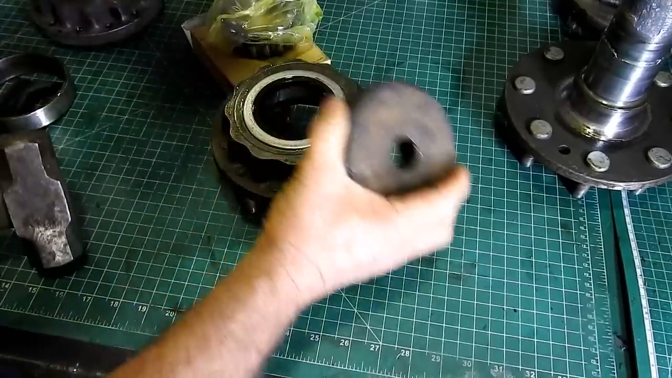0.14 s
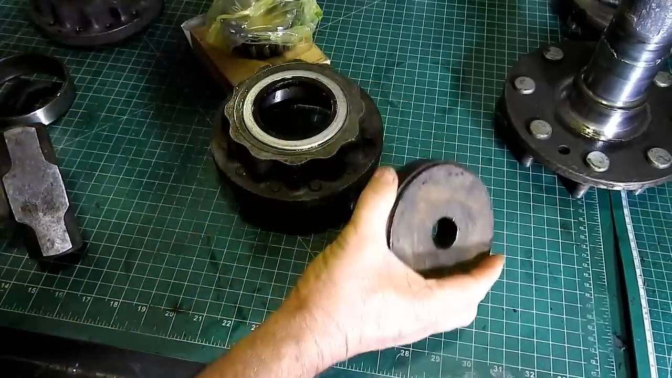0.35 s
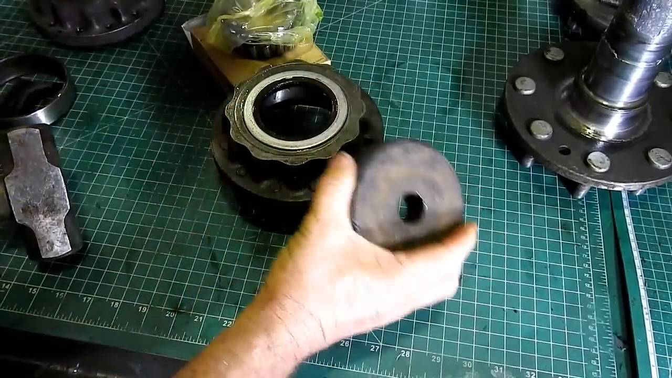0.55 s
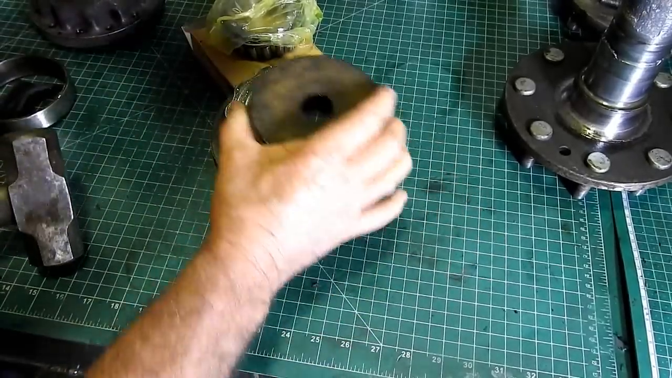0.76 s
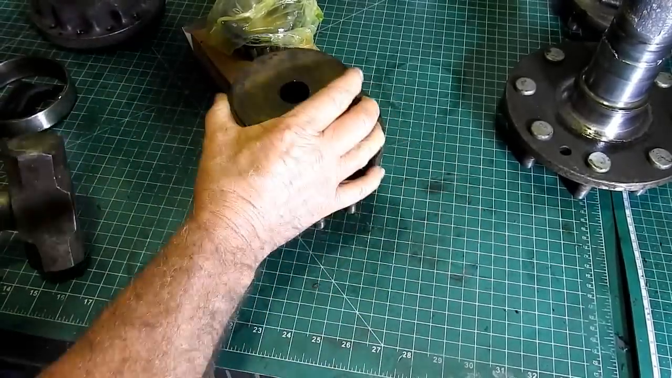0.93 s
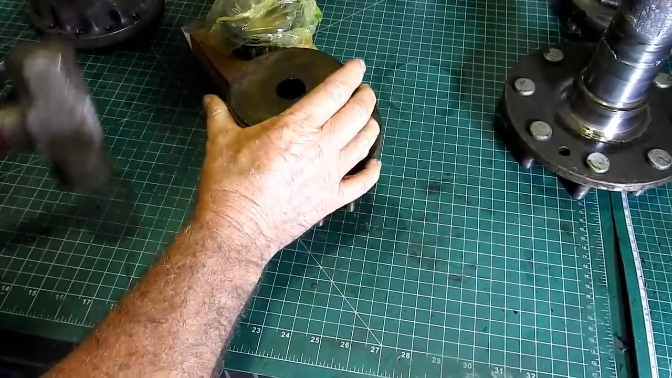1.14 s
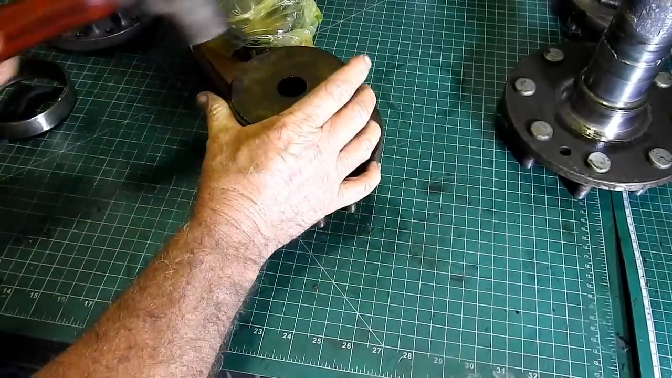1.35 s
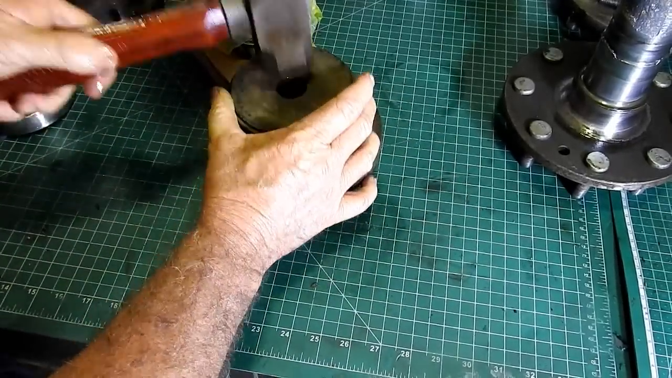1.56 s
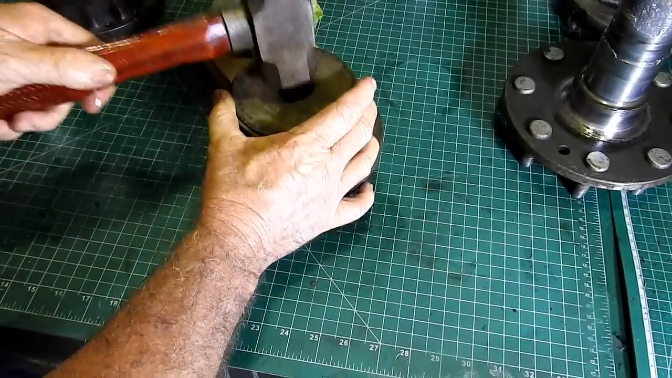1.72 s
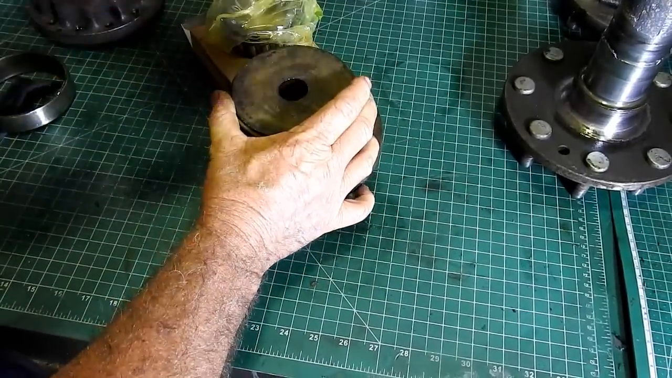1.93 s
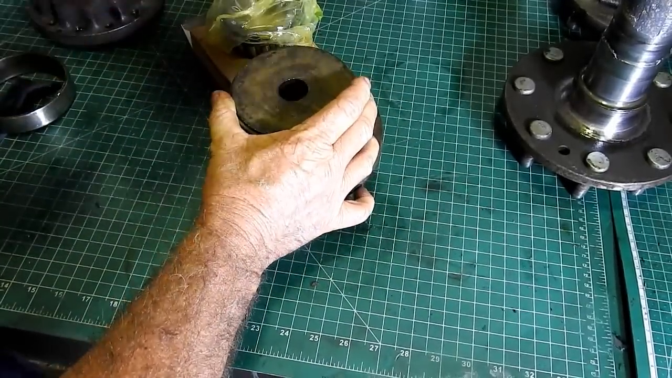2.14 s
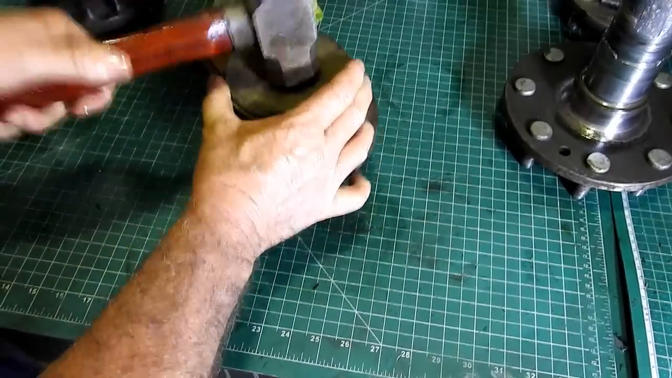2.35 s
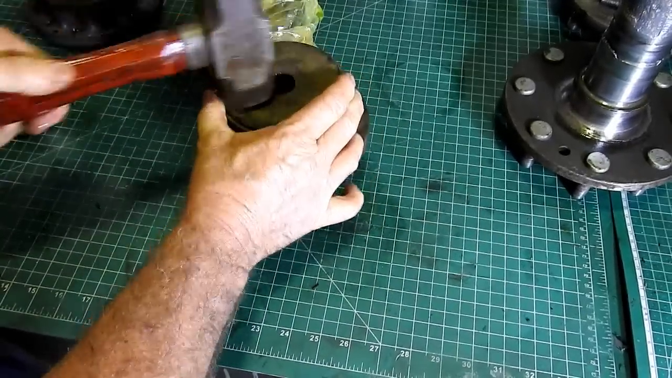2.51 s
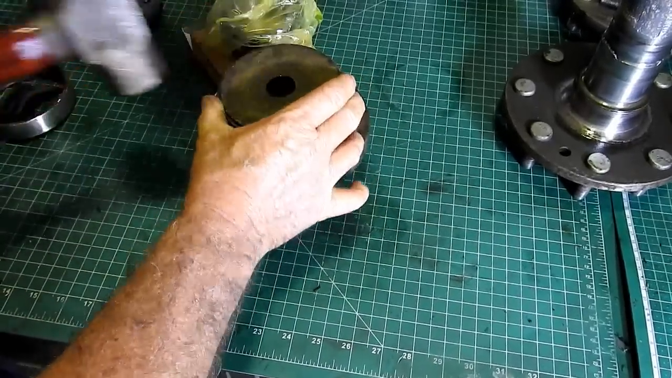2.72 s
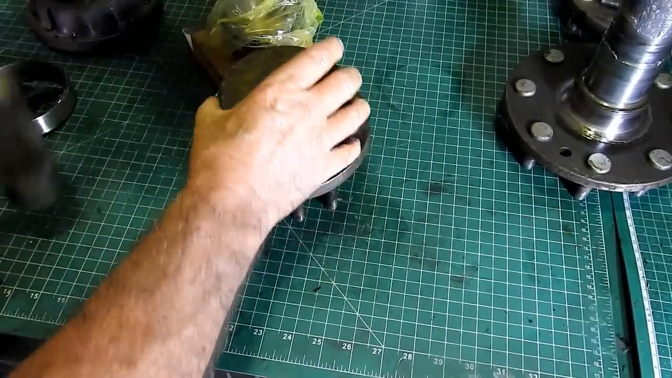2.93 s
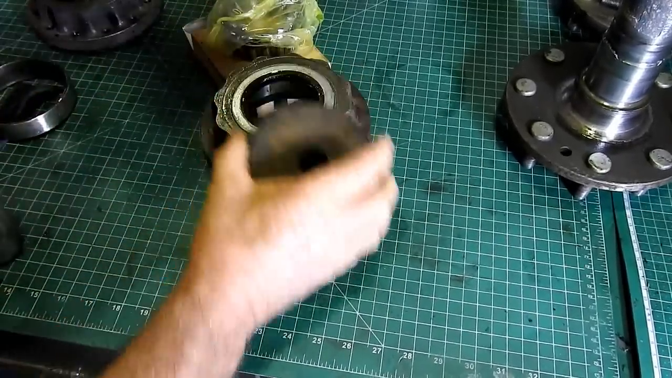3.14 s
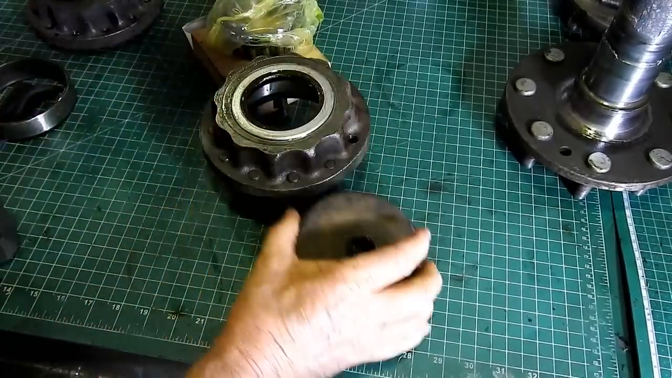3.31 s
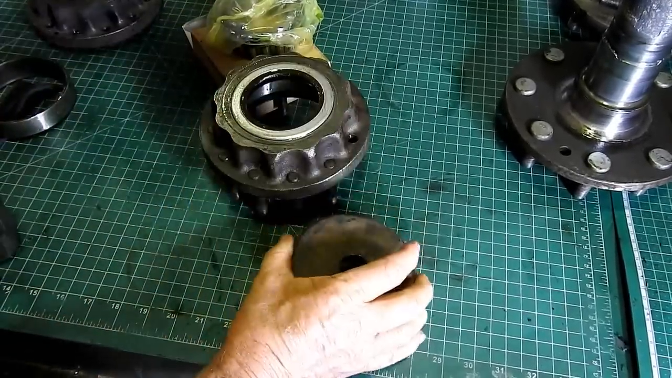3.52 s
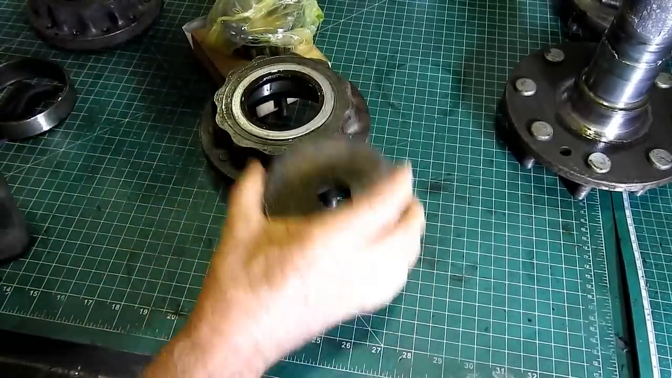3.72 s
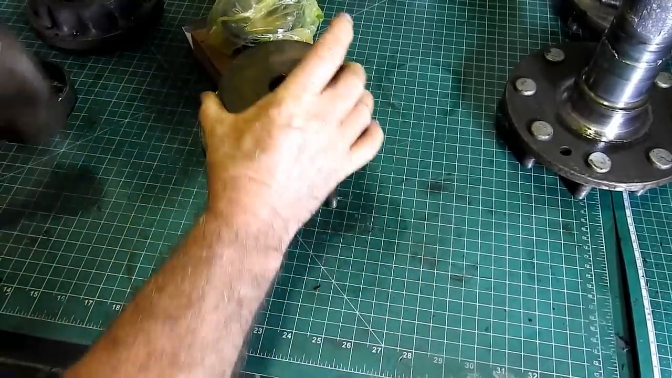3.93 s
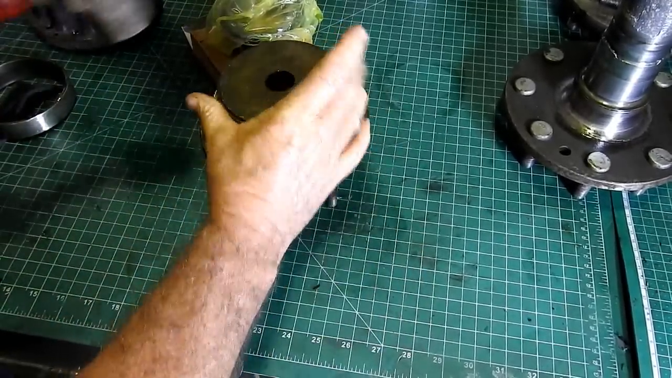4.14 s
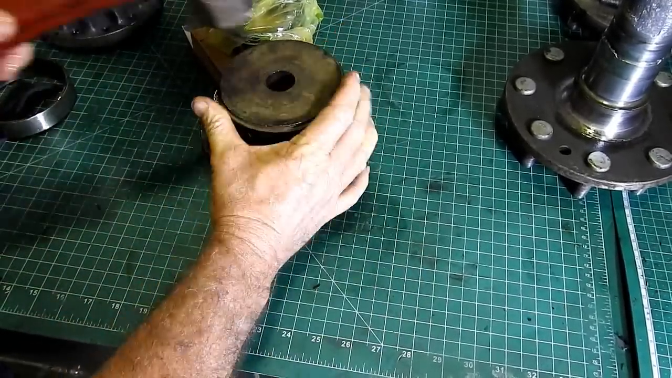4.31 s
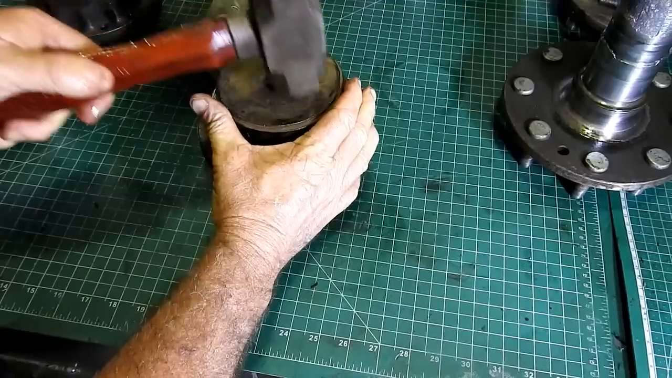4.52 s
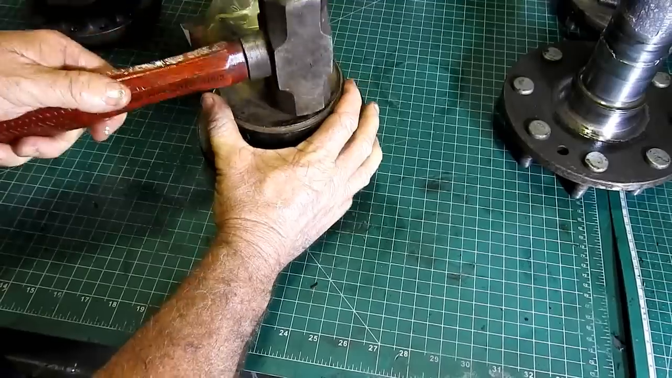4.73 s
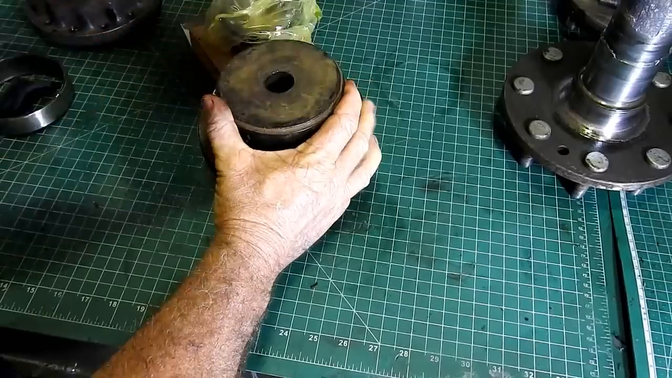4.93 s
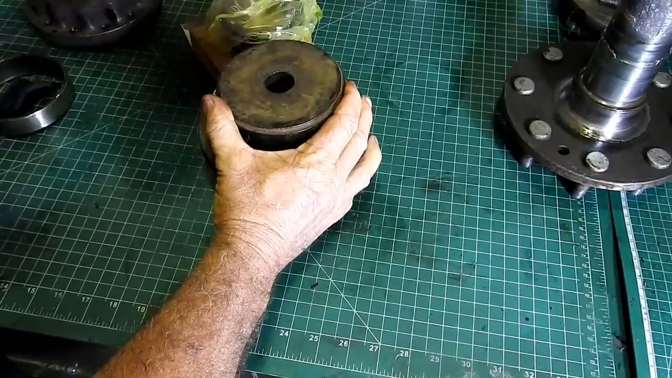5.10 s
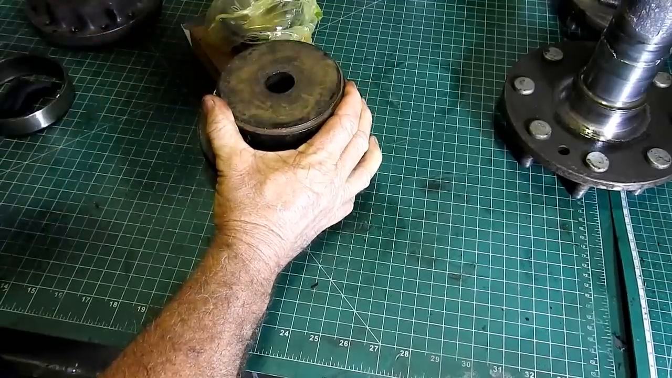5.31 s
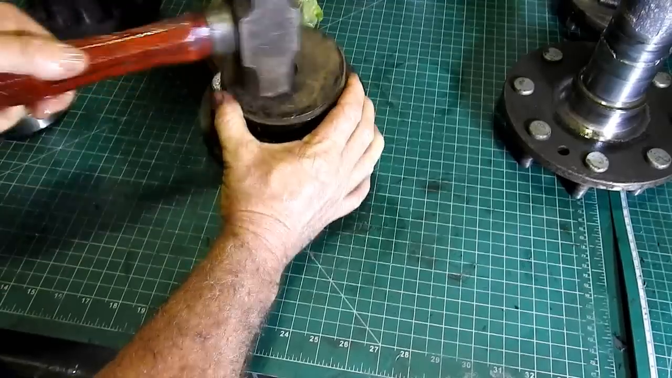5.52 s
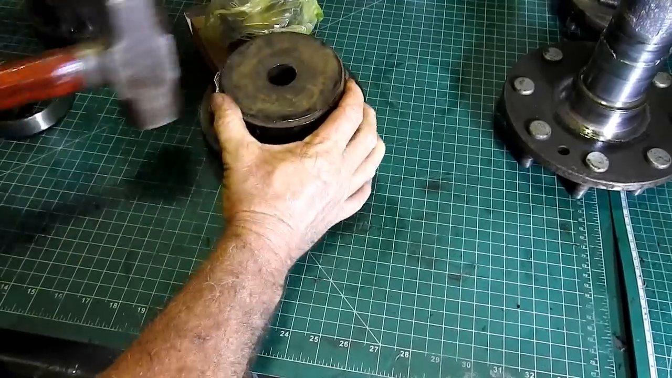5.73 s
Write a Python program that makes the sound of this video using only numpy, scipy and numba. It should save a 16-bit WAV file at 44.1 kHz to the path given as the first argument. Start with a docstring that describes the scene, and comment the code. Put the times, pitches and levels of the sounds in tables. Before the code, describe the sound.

Close up at a workbench in an echoing workshop, a steel disc knocks and scrapes off a wheel hub, then settles with small ticks. A hammer taps it, then strikes very hard. The disc is knocked and dragged off again, clinks back into place, and receives another tap and a harder, overloaded blow, with one last knock in the dying echo.

```python
"""First come a knock and a scrape of steel over a faint room hiss: a disc is dragged off a wheel hub on a bench.
Set on the hub's seal, it is hammered in two pairs, each a tap and then a hard blow; between the pairs the disc
is dragged off and set back. Each contact is a clack of filtered noise, with decaying sine waves for the ringing
steel and the thudding bench. The workshop echoes, and a limiter holds the echo of the hard blows level until
it has died down."""
import sys
import numpy as np
from scipy import signal
from scipy.fft import rfft, irfft, next_fast_len
from scipy.io import wavfile
from numba import njit

SR = 44100
rng = np.random.default_rng(int(sys.argv[2]) if len(sys.argv) > 2 else 0)


def master(y):
    """Save y as 16-bit WAV."""
    cut = np.clip(np.atleast_2d(y).T, -1, 1)
    pcm = np.round(cut * 32767)  # scale
    wavfile.write(sys.argv[1], SR, pcm.astype(np.int16))


N = 258426
T = np.arange(N) / SR  # time in s


def undb(db):
    """Turn decibels into gain."""
    return 10 ** (np.asarray(db) / 20)


def along(points, hz):
    """Read a value off a (frequency, value) table, sliding evenly in octaves between its points."""
    f, value = np.transpose(points)
    return np.interp(np.log(hz), np.log(f), value)


def fade(t, t60):
    """Die away exponentially, 60 dB down after t60 seconds."""
    return np.exp(-np.log(1000) * t / np.maximum(t60, 1e-3))


def colour(x, points, tilt=0):
    """Filter a sound to a spectrum, tilted in dB per octave, without smearing it ahead of its start."""
    count = x.shape[-1]
    size = next_fast_len(count // 2 + 2048) * 2
    hz = np.maximum(np.arange(size // 2 + 1) * SR / size, 1)
    db = along(points, hz) + tilt * np.log2(np.clip(hz, 150, 7000) / 1000)
    # folding the cepstrum forwards in time makes the filter minimum-phase
    cepstrum = irfft(np.log(undb(db)))
    cepstrum[1:size // 2] *= 2
    cepstrum[size // 2 + 1:] = 0
    response = np.exp(rfft(cepstrum))
    return irfft(rfft(x, size) * response)[..., :count]


def burst(x, db):
    """Scale a short sound to the energy of 10 ms at this level."""
    energy = np.mean(np.sum(x ** 2, axis=-1))
    return x * undb(db) * np.sqrt(SR / 100 / energy)


def add(track, s, x):
    """Mix a sound into the stereo track at time s."""
    start = max(int(s * SR), 0)
    track[:, start:start + x.shape[-1]] += x[..., :N - start]


# how far apart left and right sound: (f/Hz, side minus mid level/dB)
STEREO_WIDTH = [(60, -32), (125, -31), (250, -21.5), (500, -18), (1000, -13.5), (2000, -9.5), (4000, -9),
                (8000, -1)]


def stereo_noise(count):
    """White noise at two close microphones: alike in the bass, apart in the treble."""
    mid, side = rfft(rng.standard_normal((2, count)))
    hz = np.maximum(np.arange(len(mid)) * SR / count, 1)
    width = undb(along(STEREO_WIDTH, hz))
    left_right = np.array([mid + width * side, mid - width * side])
    return irfft(left_right / np.sqrt(1 + width ** 2), count)


def steady(points):
    """Endless stereo noise of rms 1, shaped to a spectrum."""
    x = colour(stereo_noise(N), points)
    return x / np.std(x)


def ring(modes, db, length=1, tilt=0, scatter=0):
    """A struck body sounds its own tones, each dying away; tilt favours high ones, scatter detunes at random."""
    t = T[:SR // 2]
    detune = 1 + scatter * rng.standard_normal(len(modes))
    total = 0
    for k, (hz, level, t60) in enumerate(modes):
        gain = (-1) ** k * undb(level + tilt * np.log2(hz))  # every other tone is flipped
        total = total + gain * fade(t, t60 * length) * np.sin(2 * np.pi * hz * detune[k] * t)
    return burst(total, db)


def contact(t60, chatter_db):
    """Force of a steel contact: one spike, then a brief chatter of the loose parts all around."""
    t = T[:SR // 4]
    force = burst(stereo_noise(len(t)) * fade(t, t60), chatter_db)
    force[:, 0] += np.sqrt(SR / 100)  # a spike of 0 dB on the scale of burst()
    return force


# spectra of the room noise, the bench rumble and the hiss: (f/Hz, relative level/dB)
ROOM_NOISE = [(15, -61), (25, -35), (59, 0.5), (116, -2), (156, -31), (205, 2.5), (254, -26.5), (299, 0.5),
              (413, -21), (788, -17.5), (902, -18.5), (1280, -17.5), (3660, -25.5), (6450, -16.5),
              (15700, -51)]
BENCH_RUMBLE = [(35, -35), (70, 8.5), (100, 6.5), (170, -6), (300, -8), (600, -23.5), (2000, -30.5),
                (6000, -49)]
HISS_SPECTRUM = [(500, -9), (2000, -17), (3500, -15.5), (6300, -6), (7300, -6.5), (9000, -25), (15000, -41)]
# the hand moving over the bench: (start t/s, end t/s, level/dB)
HAND_MOVES = [(0.29, 1.142, -44), (3.394, 4.223, -43), (4.628, 5.01, -33.5)]
# soft flares of hiss: t/s
HISS_FLARES = [0.483, 0.787, 1.033, 1.585, 2.252]
ROOM_NOISE_DB, RESTING_RUMBLE_DB, FLARE_DB = -48, -67, -41
HAND_FADE_S = .12


def background(flare_t60=0.66, flare_rise_s=0.0044):
    """Steady room noise, the bench rumbling under a moving hand, and a hiss that flares softly now and then."""
    flares = 0
    for s in HISS_FLARES:
        rise = np.clip((T - s) / flare_rise_s, 0, 1)
        flares = flares + undb(FLARE_DB) * rise * fade(np.abs(T - s), flare_t60)
    rumble = undb(RESTING_RUMBLE_DB)
    for start, end, db in HAND_MOVES:
        rumble = rumble + undb(db) * np.clip(np.minimum(T - start, end - T) / HAND_FADE_S, 0, 1)
    air = undb(ROOM_NOISE_DB) * steady(ROOM_NOISE)
    return air + rumble * steady(BENCH_RUMBLE) + flares * steady(HISS_SPECTRUM)


# one brief low hum: (start t/s, end t/s, f/Hz, level/dB)
LOW_HUM = (.74, .95, 305, -47)


def hum():
    """A faint low sine tone that swells and goes."""
    start, end, hz, db = LOW_HUM
    swell = np.sin(np.pi * np.clip((T - start) / (end - start), 0, 1))
    return undb(db) * swell * np.sin(2 * np.pi * hz * T)


# how long the workshop echoes: (f/Hz, 60 dB decay t/s)
ECHO_DECAY = [(80, 2.2), (250, 0.83), (700, 1), (2000, 1.1), (5700, 0.83), (8100, 0.61), (11000, 0.1)]
# how loud the workshop echoes: (f/Hz, level/dB)
ECHO_LEVEL = [(80, -14), (250, -11), (700, -8), (2000, -10.5), (6000, -9), (8500, -6), (10000, 1),
              (14000, -3)]


def workshop(x, first_wall_s=0.015, early_db=-8):
    """Nearby clutter answers faintly at once; then walls return a dense tail that loses its top treble first."""
    t = T[:int(1.5 * SR)]
    noise = rfft(stereo_noise(len(t)))
    hz = np.maximum(np.arange(noise.shape[1]) * SR / len(t), 1)
    centres = np.geomspace(50, 16000, 18)  # Hz
    tail = 0
    # each row of the identity matrix picks one band, overlapping its neighbours
    for centre, pick in zip(centres, np.eye(len(centres))):
        band = irfft(noise * np.interp(np.log(hz), np.log(centres), pick), len(t))
        shape = fade(t, along(ECHO_DECAY, centre)) * np.where(t < first_wall_s, undb(early_db), 1)
        tail = tail + band * shape * undb(along(ECHO_LEVEL, centre)) / np.sqrt(np.sum(shape ** 2))
    return signal.fftconvolve(x[None], tail, axes=1)[:, :N]


# tones of the workbench: (f/Hz, relative level/dB, 60 dB decay t/s)
BENCH_TONES = [(75.2, -6, 0.27), (104.1, 0.5, 0.21), (165.6, -0.5, 0.23), (206.4, -1, 0.25),
               (258, 0.5, 0.13), (301.4, 0.5, 0.16), (352.4, -7.5, 0.17), (408.5, -7, 0.16)]


def touch(db, spectrum, tilt, t60, thud_db):
    """One contact on the disc: a chattering clack, and the bench thudding under it."""
    clack = burst(colour(contact(t60, chatter_db=12.5), spectrum, tilt), db)
    thud = ring(BENCH_TONES, thud_db, scatter=0.046)
    return thud + np.pad(clack, ((0, 0), (0, len(thud) - clack.shape[1])))


# spectra of a light tick and of a clack on the disc: (f/Hz, relative level/dB)
TICK_SPECTRUM = [(150, -13), (700, -8), (2100, -12.5), (3700, -15.5), (6600, -1), (8500, -16), (11000, -30),
                 (15000, -37)]
DISC_SPECTRUM = [(35, -17.5), (100, -7.5), (200, -1.5), (400, -8.5), (700, -12), (1200, -14.5), (2100, -15),
                 (3700, -25.5), (6600, -17), (8200, -32), (10000, -45), (16000, -87)]
# light ticks of steel just touching: (t/s, level/dB)
STEEL_TICKS = [(.993, -36.5), (1.1183, -30.5), (1.305, -35), (2.395, -34.5), (5.5192, -40)]
TICK_T60_S, TICK_THUD_DB = 0.029, -17  # chatter decay; thud relative to the tick
# soft bumps of the hand shifting its grip: (t/s, level/dB)
HAND_BUMPS = [(4.282, -40.5), (4.545, -45), (4.64, -38.5)]
BUMP_T60_S, BUMP_TILT, BUMP_THUD_DB = 0.049, -5.5, -1  # rub decay; dB per octave; thud relative to the bump


def fingering():
    """While the disc is lined up, steel ticks brightly on steel and the hand bumps softly."""
    out = np.zeros((2, N))
    for s, db in STEEL_TICKS:
        add(out, s, touch(db, TICK_SPECTRUM, 0, TICK_T60_S, db + TICK_THUD_DB))
    for s, db in HAND_BUMPS:
        add(out, s, touch(db, DISC_SPECTRUM, BUMP_TILT, BUMP_T60_S, db + BUMP_THUD_DB))
    return out


# tones of the steel ring of the bearing (its race): (f/Hz, relative level/dB, 60 dB decay t/s)
RACE_TONES = [(1446, -1, 0.019), (2025, 3.5, 0.016), (2740, -2, 0.0098), (4074, -3.5, 0.039),
              (4210, -20, .06), (6100, 2, 0.013)]
# the disc's edge clinking on the race: (t/s, level/dB)
EDGE_CLINKS = [(.138, -28), (4.1424, -21.5)]


def clinks():
    """Set down on its edge, the disc rings the bearing race."""
    out = np.zeros((2, N))
    for s, db in EDGE_CLINKS:
        add(out, s, ring(RACE_TONES, db))
    return out


KNOCK_T60_S = 0.038  # chatter decay of drags and knocks
# tones of the wheel hub: (f/Hz, relative level/dB, 60 dB decay t/s)
HUB_TONES = [(564, 13.5, 0.037), (799.6, 8, 0.11), (1046, 1, 0.057), (1254, 2.5, 0.11), (1850, -25, 0.011)]
# the disc dragged off the hub: (start t/s, hold t/s, level/dB, tilt in dB per octave)
DISC_DRAGS = [(0.041, 0.022, -14.5, -1), (3.203, 0.043, -12.5, -2.06)]
DRAG_ATTACK_S, DRAG_T60_S = 0.004, 0.43
CATCHES_PER_S, CATCH_SPREAD_DB = 900, 2.5
DRAG_THUD_DB, DRAG_HUB_DB = -34, -12.5  # relative to the scrape


def drags():
    """Dragged over the hub, the disc catches and slips at random; each catch clacks and shakes hub and bench."""
    out = np.zeros((2, N))
    t = T[:SR // 2]
    for s, hold, db, tilt in DISC_DRAGS:
        pressure = np.minimum(t / DRAG_ATTACK_S, 1) * fade(np.maximum(t - hold, 0), DRAG_T60_S)
        caught = rng.random(len(t)) < CATCHES_PER_S / SR
        strength = undb(CATCH_SPREAD_DB * rng.standard_normal(len(t)))
        direction = np.sign(rng.standard_normal(len(t)))
        catches = caught * strength * direction
        force = pressure * catches / np.sqrt(np.mean(catches ** 2) * SR / 100)
        body = touch(db, DISC_SPECTRUM, tilt, KNOCK_T60_S, db + DRAG_THUD_DB)
        body = body + ring(HUB_TONES, db + DRAG_HUB_DB, tilt=tilt, scatter=0.033)
        add(out, s, signal.fftconvolve(force[None], body, axes=1))
    return out


# tones of the steel disc, whose decay each contact scales: (f/Hz, relative level/dB, 60 dB decay t/s)
DISC_TONES = [(8440, 28, 0.14), (13900, -9, 0.2)]
# disc and hub knocking together: (t/s, clack level/dB, bench thud level/dB, disc ring level/dB)
HUB_KNOCKS = [(.009, -2.5, -3, -47), (0.107, -20.5, -17.5, -38), (.138, -13, -15, -65),
              (.188, -22.5, -30.5, -62), (1.115, -33.5, -18.5, -68), (2.531, -7, 11.5, -51),
              (3.1777, -1, -4.5, -41.5), (3.361, -23, -22, -45), (4.141, -16, -13, -31.5),
              (4.175, -25, -28.5, -38), (5.687, 8, 9, -42)]
KNOCK_TILT = -0.96  # dB per octave, when thud and clack are equal
DULLING = 0.21  # dB per octave lost for each dB that the thud exceeds the clack
KNOCK_HUB_DB = -14.5  # hub ring relative to the thud


def knocks():
    """The hand-held disc knocks on the hub, which bounces on the bench; a heavier thud means a duller clack."""
    out = np.zeros((2, N))
    for s, db, thud_db, disc_db in HUB_KNOCKS:
        tilt = KNOCK_TILT - DULLING * (thud_db - db)
        add(out, s, touch(db, DISC_SPECTRUM, tilt, KNOCK_T60_S, thud_db))
        add(out, s, ring(DISC_TONES, disc_db, length=0.52))
        add(out, s, ring(HUB_TONES, thud_db + KNOCK_HUB_DB, tilt=tilt, scatter=0.024))
    return out


# spectrum of the hammer's clack, before BLOW_TILT: (f/Hz, relative level/dB)
HAMMER_SPECTRUM = [(40, -7), (100, 1.5), (180, 12.5), (450, 3), (1000, -2.5), (1550, -6), (2300, -3),
                   (3700, -11), (5200, -9), (6900, -5.5), (7700, -15), (8500, -21), (9600, -31.5),
                   (16000, -34.5)]
BLOW_TILT = 3.1  # dB per octave
CRACK_T60_S, CRACK_DB = .012, -6.5  # steel faces grinding for an instant, relative to the spike
BLOW_THUD_DB, THUD_GROWTH = -7.5, 0.62  # bench thud under a 0 dB blow; dB more per dB of blow
BLOW_HUB_DB, BLOW_RACE_DB = -17, -5.5  # hub and race rings relative to the thud
RING_LENGTH, RING_HALVING_DB = .86, 10  # disc ring length factor at 0 dB; a blow this much harder halves it
# blows: (t/s, clack level/dB, contact cut-off f/Hz, disc ring level/dB, rebound rate f/Hz, rebound share 0-1)
HAMMER_BLOWS = [(1.7252, 1, 10300, -14.5, 1418, 0.06), (2.4345, 28.5, 11600, -22, 6700, 0),
                (4.7405, -6, 6200, -35.5, 1385, 0.86), (5.5560, 30, 13000, 24.5, 7160, 0.17)]


def hammer(chatter_t60=0.12, chatter_db=-11):
    """Some blows bounce again within 1 ms, combing the clack; harder blows thud more, ring shorter."""
    out = np.zeros((2, N))
    t = T[:SR // 4]
    for s, db, edge_hz, disc_db, rebound_hz, share in HAMMER_BLOWS:
        crack = burst(stereo_noise(len(t)) * fade(t, CRACK_T60_S), CRACK_DB)
        force = contact(chatter_t60, chatter_db) + crack
        force = force + share * np.roll(force, round(SR / rebound_hz), axis=1)
        # a longer contact has less top
        force = signal.sosfilt(signal.butter(6, edge_hz, fs=SR, output="sos"), force)
        add(out, s, burst(colour(force, HAMMER_SPECTRUM, BLOW_TILT), db))
        thud_db = BLOW_THUD_DB + THUD_GROWTH * db
        add(out, s, ring(BENCH_TONES, thud_db, scatter=0.029))
        add(out, s, ring(HUB_TONES, thud_db + BLOW_HUB_DB))
        add(out, s, ring(RACE_TONES, thud_db + BLOW_RACE_DB))
        add(out, s, ring(DISC_TONES, disc_db, RING_LENGTH * 2 ** (-db / RING_HALVING_DB)))
    return out


def scene():
    """Work on the bench straight ahead, its echo and the background."""
    work = hammer() + knocks() + drags() + fingering() + clinks()
    return work + workshop(work.mean(axis=0)) + background() + hum()


@njit
def follow(x, attack, release):
    """Trace the loudness: rise fast and fall more slowly."""
    out, e = np.empty(len(x)), 0.
    for i in range(len(x)):
        e += (x[i] - e) * (attack if x[i] > e else release)
        out[i] = e
    return out


def limiter(x, top_db=-9.5, attack_s=0.0023, release_s=0.0074, ahead_s=0.00079):
    """Turn loud moments down, looking a moment ahead, with the same gain on both channels."""
    loudest = np.abs(x).max(axis=0)
    envelope = follow(loudest, 1 / (1 + attack_s * SR), 1 / (1 + release_s * SR))
    ahead = np.interp(T + ahead_s, T, envelope)
    return x / np.maximum(ahead / undb(top_db), 1)


def record(dry, overload_db=19, low_cut_hz=52, top_hz=15650):
    """The hardest blows overload the microphone; the limiter acts, peaks clip, and deep bass and top are cut."""
    headroom = undb(overload_db)
    held = limiter(headroom * np.tanh(dry / headroom))
    low_cut = signal.butter(2, low_cut_hz, "high", fs=SR, output="sos")
    clipped = np.clip(signal.sosfilt(low_cut, held), -1, 1)
    top_cut = signal.ellip(8, .2, 70, top_hz, fs=SR, output="sos")
    return signal.sosfilt(top_cut, clipped)


dry = scene()
out = record(dry)
master(out)
```